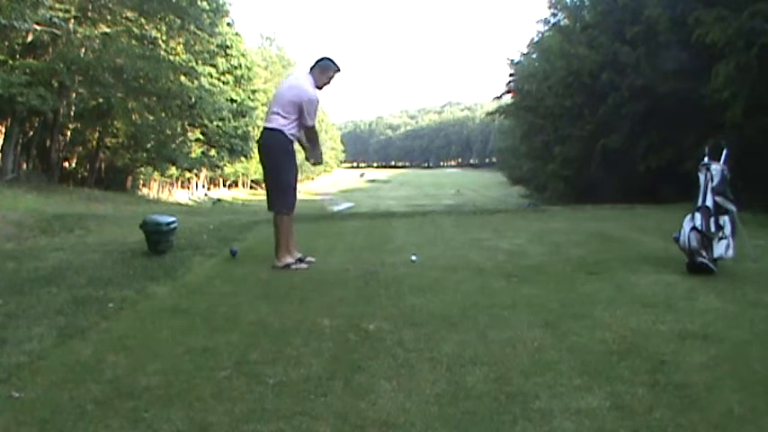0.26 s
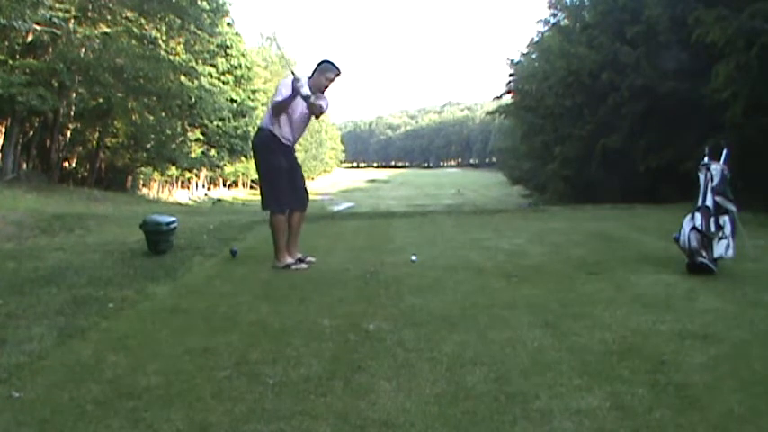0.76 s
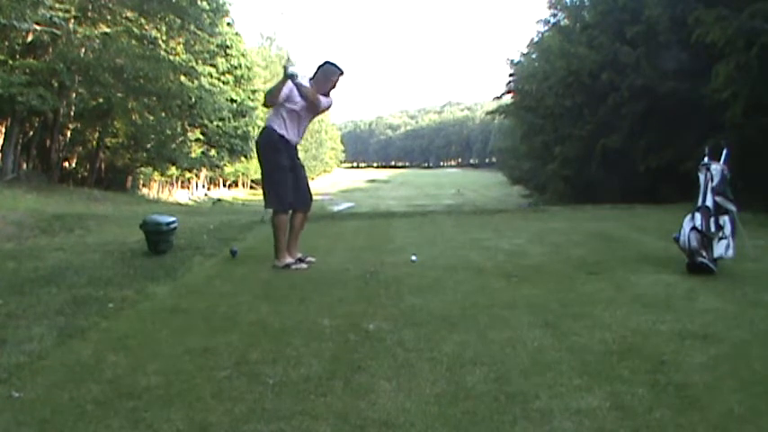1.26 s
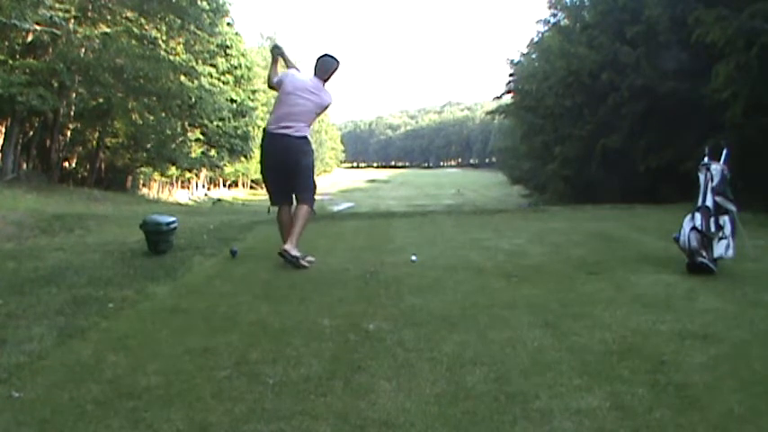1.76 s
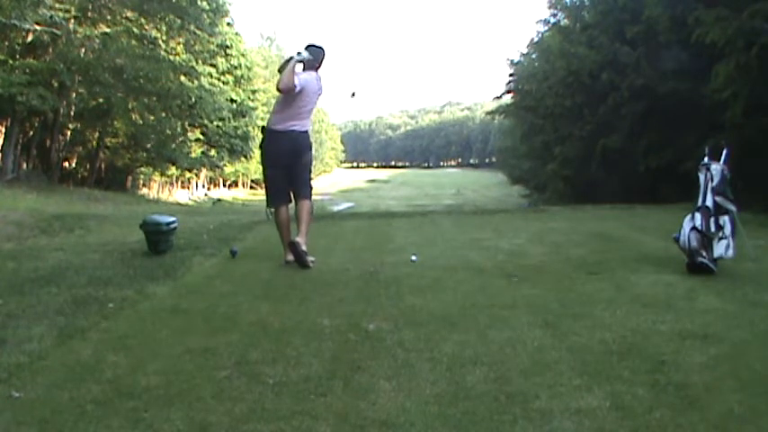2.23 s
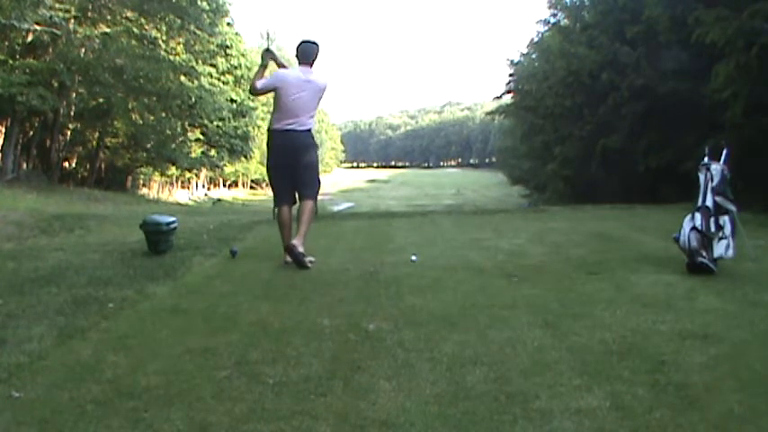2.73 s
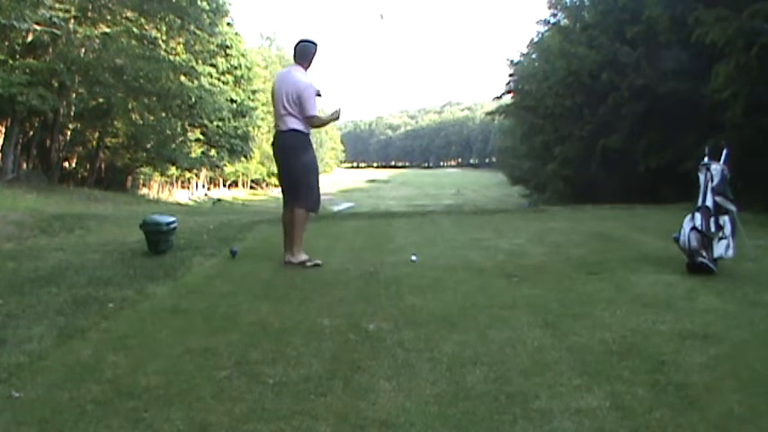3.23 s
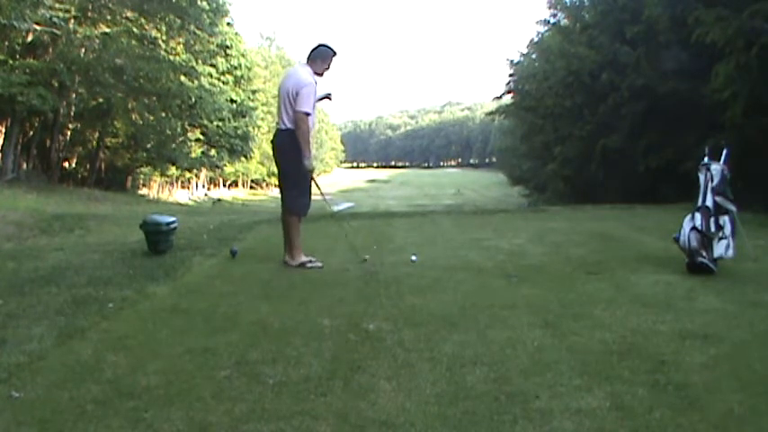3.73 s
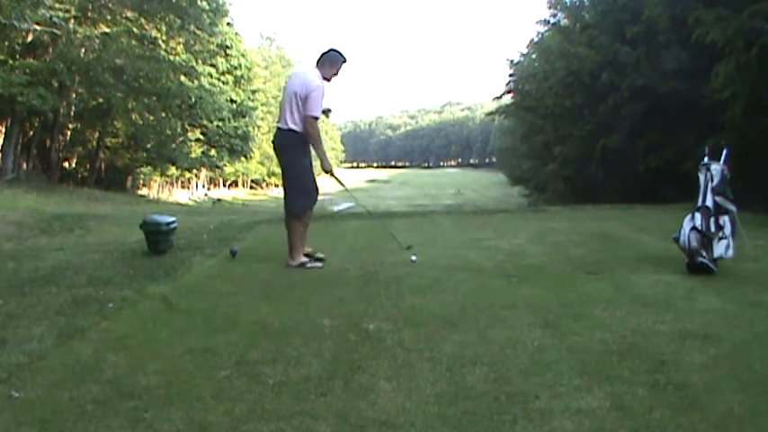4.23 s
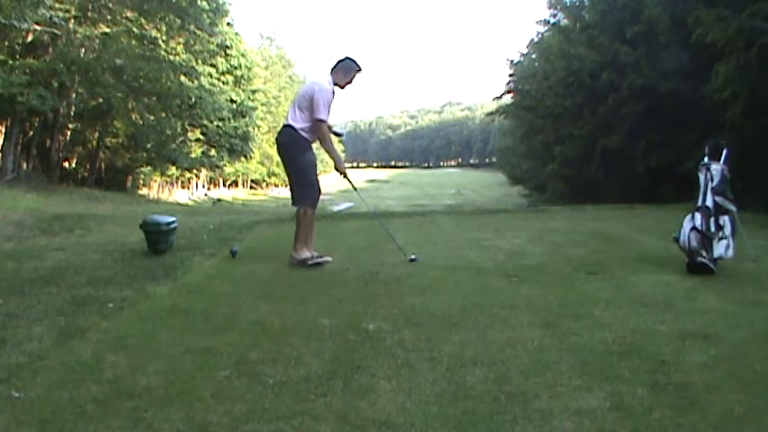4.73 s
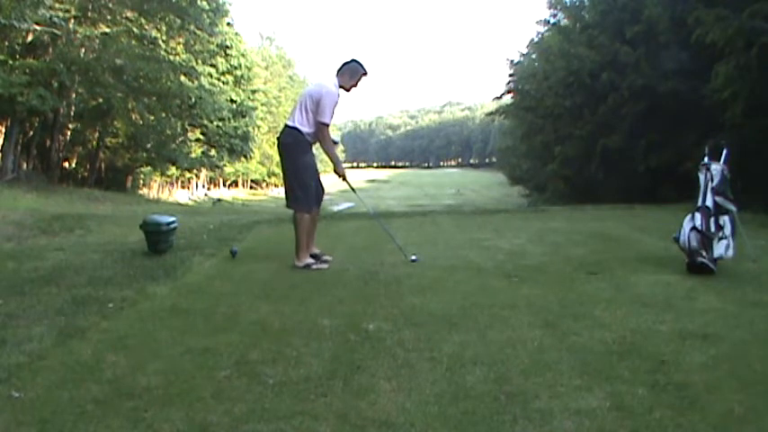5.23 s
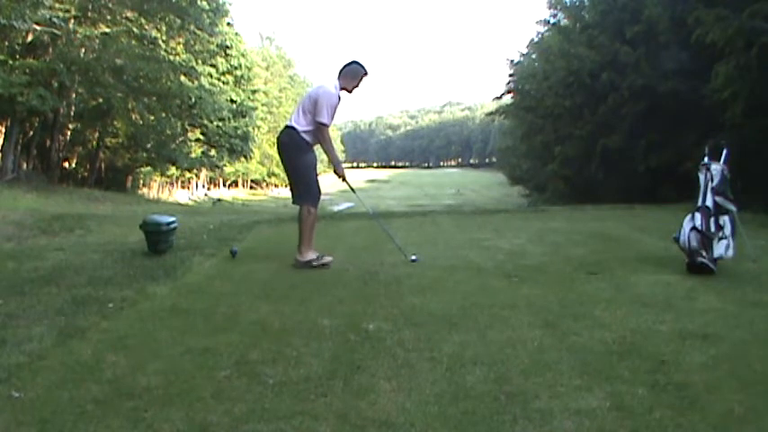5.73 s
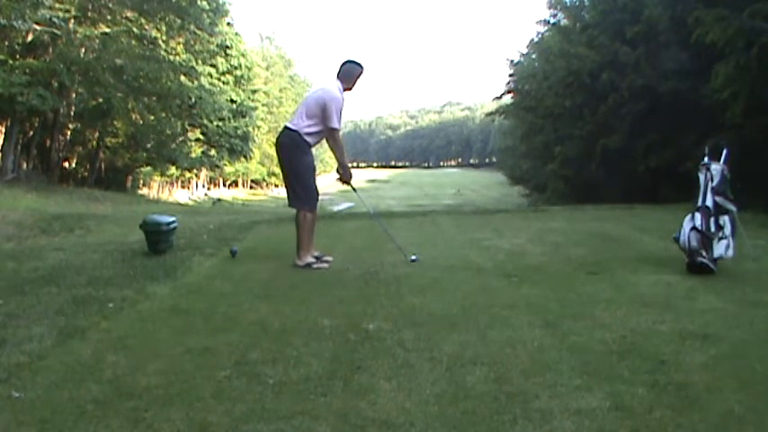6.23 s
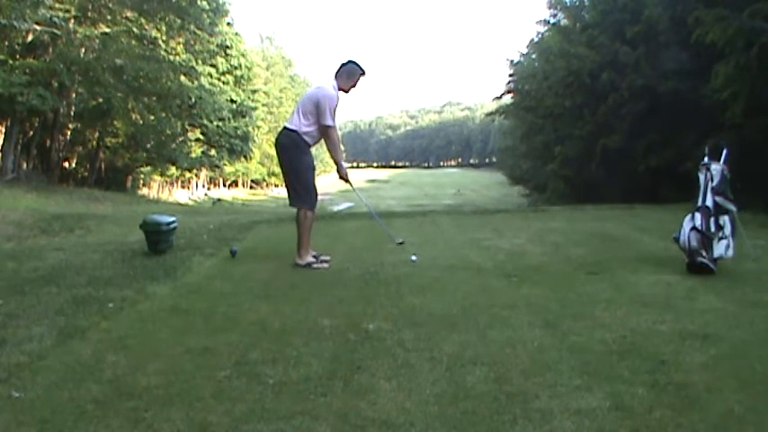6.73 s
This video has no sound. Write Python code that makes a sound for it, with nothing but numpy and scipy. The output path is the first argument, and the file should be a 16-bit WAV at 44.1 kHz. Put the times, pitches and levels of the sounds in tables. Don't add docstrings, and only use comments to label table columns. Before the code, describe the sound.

Outdoors on a grassy tee between woods, a low propeller drone grows and slowly drops in pitch over faint mower hum, traffic and hiss. High birds trill, chip and chatter throughout. A short club swish brushes the grass about a second and a half in; later come a sharp click and a soft double thud. A bird calls sharply near the end. The microphone stands back, with soft woodland echo.

```python
import sys
import numpy as np
from scipy import signal
from scipy.fft import rfft, irfft, next_fast_len
from scipy.io import wavfile

SR = 44100
rng = np.random.default_rng(int(sys.argv[2]) if len(sys.argv) > 2 else 0)


def attenuation_scalar(level_db):
    decades = np.asarray(level_db, float) / 20
    return 10 ** decades


def generate_wav(signal):
    frames = np.transpose(np.atleast_2d(signal))
    scaled = np.clip(frames, -1, 1) * 32767
    pcm = np.round(scaled).astype(np.int16)
    wavfile.write(sys.argv[1], SR, pcm)


N = 307377
SIDES = np.array([[1], [-1]])

# (frequency [Hz], level [dB per Hz])
AIR_COLOUR = [(590, -24), (1000, 0), (1220, -4), (4920, -8.5), (7030, -17.5), (9040, -16), (15500, -18)]
# (frequency [Hz], left minus right [dB])
NOISE_LEAN = [(60, -0.5), (110, -.3), (200, -1.5), (380, -2.5), (700, -.5), (1290, -1.5), (2380, 1),
              (4400, 2), (8120, .5), (15000, 0.5)]
# (frequency [Hz], side minus mid [dB])
NOISE_WIDTH = [(30, -21), (60, -31), (110, -27), (200, -13.5), (380, -3.5), (700, -2), (1290, -1.5),
               (2380, -2), (4400, -8), (8120, -3.5), (15000, -13.5)]
# (frequency [Hz], level [dB per Hz])
TRAFFIC_COLOUR = [(40, -51), (100, -15), (150, 5), (220, 2.5), (300, -3.5), (480, -12.5), (800, -50)]
# (time [s], rise [dB])
TRAFFIC_SURGES = [
    (.8, 9.5),
    (2.95, 11.5),
    (4.15, 4),
    (5.1, 4),
    (6.15, 6),
]
# (time [s], frequency [Hz], level [dB])
MOWER_BLADE = [(0, 92.9, -53), (.9, 93, -49.5), (1.3, 94.5, -46.5), (1.6, 96, -43.5), (1.9, 96.5, -47),
               (2.2, 98, -42.5), (2.6, 104.4, -42.5), (3.5, 102.8, -44.5), (5, 104.6, -50),
               (7, 104.3, -49.5)]
# (frequency [Hz], level [dB])
MOTOR_WHINE = [(700.8, -69), (840, -70)]

# (time [s], frequency [Hz])
SHAFT_SPEED = [(0, 18.12), (1.3, 18.15), (2, 18.02), (2.75, 17.82), (3.5, 17.45), (4.25, 16.95), (5, 16.62),
               (5.75, 16.37), (6.97, 16.08)]
# (time [s], level [dB])
PASS_SWELL = [(0, -2), (.7, -1), (1.15, 0.5), (1.7, -2), (2.1, 3), (2.5, -3.5), (3.2, 1), (4.2, 1),
              (4.9, -1.5), (5.3, -1), (5.95, 3), (6.3, -3), (6.97, -2)]
# (time [s], left minus right [dB])
PASS_POSITION = [(0, -0.5), (2, -1), (3.5, -0.5), (4.8, -.1), (6.1, -0.4), (6.97, -.3)]
# (multiple, level before [dB], level after [dB], time of change [s], later sink [dB per s])
STRONG_ORDERS = [
    (5, -49.5, -37, 2.25, 0.1),
    (8, -48.5, -59, 1.98, 0),
    (8, -71, -42, 3.7, 1.5),
    (10, -59, -41, 5.02, 0.3),
    (15, -64.5, -49.5, 5.52, 4.5),
]
# (multiple, level when far [dB], level when near [dB])
WEAK_ORDERS = [(2, -62, -70), (3, -57, -62.5), (4, -52, -67), (6, -60.5, -47.5), (7, -59, -52),
               (9, -58, -54), (11, -66.5, -56.5), (12, -60.5, -54.5), (13, -65, -58), (14, -65, -72),
               (16, -77, -91), (17, -69, -88)]
# (multiple, time [s], half length [s], level [dB])
ORDER_FLARES = [(8.5, 2.86, 0.65, -50), (16, 2.94, 0.25, -55), (11, 2.84, 0.31, -53.5),
                (15, 4.37, 0.52, -56), (7, 3.05, 0.69, -52), (7, 0.61, 0.35, -54), (15, 0.91, 0.19, -55),
                (13, 0.83, 0.23, -53), (11.5, 2.23, .35, -53), (10, 4.2, 0.35, -53.5),
                (9, 6.26, 0.33, -47.5), (11, 6.3, 0.5, -53.5), (25, 3.08, 0.32, -59), (10, .3, 0.23, -52.5),
                (11, .35, .25, -54), (4, .6, .3, -50), (8, .9, .25, -49), (8, 1.75, .15, -49),
                (10, .9, .2, -54), (10, 4.75, .2, -52)]
# (frequency [Hz], level [dB per Hz])
ROAR_COLOUR = [(12, -42), (20, -10.5), (43, -18.5), (70, -2), (92, -3), (159, -5), (257, -12.5), (350, -18),
               (422, -16.5), (565, -23), (837, -20.5), (912, -24.5), (1200, -30.5), (1560, -36),
               (2640, -120)]
BLADE_ORDER = 5

# (start [s], end [s], first pitch [Hz], level [dB], rate [notes per s])
TRILL_RUNS = [(0, 0.097, 9000, -66, 30), (.33, .6, 9000, -63.5, 29), (0.949, 1.335, 9080, -65, 35),
              (1.459, 1.753, 8800, -61.5, 29), (2.17, 2.45, 9100, -66, 48), (2.805, 3.05, 8720, -63, 35),
              (3.22, 3.593, 8720, -64, 37), (3.834, 4.2, 8800, -64, 35), (4.548, 4.8, 8740, -61.5, 39),
              (4.951, 5.3, 8700, -60, 29), (5.241, 5.33, 9850, -64, 40), (5.499, 5.85, 9000, -64, 30),
              (6.519, 6.78, 8700, -65, 27)]
# (start [s], end [s], first pitch [Hz], last pitch [Hz], level [dB])
WARBLE_PHRASES = [(.147, .235, 2950, 2960, -59), (.16, .22, 3250, 4300, -56), (0.22, .305, 3500, 3800, -61),
                  (.31, 0.378, 4450, 3800, -63), (.365, .435, 3450, 2350, -57.5),
                  (0.441, .5, 2350, 2350, -62), (0.45, .56, 2550, 2650, -64), (.5, .55, 2700, 3400, -58),
                  (.555, 0.54, 3300, 2600, -61), (1.61, 1.66, 2600, 2600, -56),
                  (1.655, 1.69, 2650, 3650, -56), (1.7, 1.79, 3350, 3350, -62),
                  (1.77, 1.81, 2600, 2800, -61), (1.52, 1.62, 4250, 3900, -58),
                  (1.58, 1.64, 3600, 3500, -62), (2.5, 2.56, 4900, 5300, -62), (2.6, 2.64, 3400, 3380, -59),
                  (2.73, 2.78, 2300, 2300, -59), (2.85, 2.92, 2148, 2100, -59),
                  (2.532, 2.61, 4400, 3900, -60), (2.59, 2.65, 3000, 3500, -60),
                  (2.75, 2.8, 2750, 2700, -56), (3.1, 2.89, 2300, 2550, -60),
                  (3.635, 3.68, 3450, 4000, -59), (3.67, 3.76, 4000, 3950, -63),
                  (4.155, 4.22, 3400, 3150, -54), (3.99, 4.1, 3400, 3300, -61),
                  (3.83, 3.92, 2450, 2260, -54), (3.77, 3.84, 2500, 2400, -59),
                  (3.93, 3.99, 2100, 2300, -56), (3.81, 3.86, 2000, 2000, -58),
                  (4.681, 4.85, 3360, 3420, -63.5), (4.58, 4.88, 2300, 2400, -59),
                  (3.039, 3.14, 3400, 3200, -60), (4.985, 5.05, 2880, 3580, -54),
                  (5.05, 5.119, 3500, 3500, -59), (5.13, 5.158, 3250, 3250, -56),
                  (4.99, 5.02, 2700, 3050, -60), (5.025, 5.06, 2600, 2650, -59),
                  (5.16, 5.23, 2600, 3010, -58), (5.22, 5.33, 3000, 3000, -60),
                  (6.17, 6.195, 3400, 3500, -57), (6.27, 6.305, 2680, 2950, -58),
                  (6.3, 6.35, 2750, 2800, -59), (6.345, 6.36, 3200, 3200, -56),
                  (6.3, 6.36, 3250, 3200, -61), (6.349, 6.45, 2600, 2600, -59),
                  (6.26, 6.34, 2200, 2200, -57), (6.141, 6.239, 2440, 2600, -60)]
# (start [s], end [s], first pitch [Hz], last pitch [Hz], level [dB])
CHATTER_PHRASES = [(2.46, 2.8, 4200, 3500, -60), (2.6, 2.97, 3000, 2900, -62.5),
                   (3.7, 4.0, 4300, 4600, -64), (3.81, 3.94, 4800, 4700, -59),
                   (4.98, 5.17, 3100, 3500, -61), (5.15, 5.35, 2700, 2800, -61),
                   (6.2, 6.45, 2800, 2600, -62), (4, 4.32, 3000, 2900, -59), (1.49, 1.68, 4050, 3900, -58),
                   (3.62, 3.78, 4500, 4600, -64.5), (.16, .36, 3600, 4000, -65),
                   (1.64, 1.82, 3500, 3700, -63), (4.56, 4.9, 2500, 2500, -62),
                   (4.65, 5.3, 4900, 4700, -67), (.45, .62, 2800, 2900, -64)]
# (start [s], level [dB], second half [dB], upswing depth [0-1], first downstroke [dB])
CHIP_CALLS = [(.566, -62, -2, 0.7, -8), (1.558, -53, -5, 0.7, -10), (2.016, -52.5, -6, 0.9, -14),
              (3.319, -51, -5, 0.99, -8), (3.825, -52, -5, 0.6, -3), (4.006, -57.5, -5, 1, 13),
              (4.14, -65, 5, .8, -8), (4.558, -60, 0, 1, 2), (4.704, -57.5, 1, 0.95, -1),
              (5.209, -59.5, 1.5, 0.8, -1), (5.517, -55, -1, 1, 9), (5.935, -57, 3, 1, -1),
              (6.529, -55.5, 0, 1, -.5), (6.869, -60, 1, 1, -3)]
# (time [s], frequency [Hz])
CHIP_SHAPE = [(0, 8870), (.007, 6916), (.013, 6970), (.019, 8240), (0.025, 9020), (0.028, 7880),
              (.037, 7160), (0.043, 8500)]
# (time [s], left minus right [dB])
CHIP_PERCH = [(5.3, 2), (6.0, -1.2)]
# (time [s], frequency [Hz], level [dB])
SEEP_CALL = [(5.85, 7950, -71), (5.87, 7900, -64), (5.9, 7680, -54.5), (5.93, 7500, -72)]
# (time [s], frequency [Hz], level [dB])
ALARM_CALL = [
    (5.364, 10900, -66),
    (5.368, 11200, -57),
    (5.373, 9800, -49),
    (5.379, 8100, -45),
    (5.384, 7250, -41),
    (5.389, 6880, -39),
    (5.396, 6750, -39),
    (5.41, 6980, -45),
    (5.421, 7200, -52),
]

# (start [s], length [s], first pitch [Hz], last pitch [Hz], level [dB])
THRUSH_SLURS = [(2.468, 0.024, 2760, 2420, -54.5), (2.487, 0.019, 2420, 2370, -53),
                (2.555, 0.043, 2600, 2160, -52), (2.705, 0.022, 2450, 2330, -48),
                (3.492, .02, 2220, 2300, -54), (3.508, 0.042, 2305, 2910, -49.5),
                (3.55, 0.024, 2480, 2360, -49.5), (3.572, .053, 2370, 2330, -47),
                (3.63, .025, 2300, 2400, -55), (3.705, 0.05, 2250, 2560, -57),
                (3.725, 0.042, 2300, 2160, -60), (3.956, .025, 2730, 3350, -55),
                (3.985, .03, 3400, 3300, -57), (4.03, 0.068, 2750, 2990, -56),
                (4.481, 0.071, 2150, 2190, -56.5), (4.535, .03, 2450, 2300, -58),
                (4.62, .03, 2485, 2200, -54), (4.553, 0.075, 2790, 2000, -49.5),
                (4.651, 0.054, 2620, 1940, -49.5), (4.647, 0.043, 1995, 2050, -53),
                (5.082, 0.035, 2110, 2100, -51.5), (2.593, 0.034, 2150, 2100, -53),
                (2.665, 0.04, 2215, 2680, -51.5), (4.1, 0.045, 3400, 2590, -57),
                (4.7, .05, 3000, 3230, -67), (4.762, 0.0366, 2153, 2680, -50),
                (4.796, .045, 2680, 2145, -50), (4.105, 0.029, 2350, 2150, -55),
                (4.155, .045, 2120, 2260, -57), (6.187, 0.029, 2090, 1940, -52),
                (6.217, 0.0409, 1954, 2110, -54), (3.085, .015, 2400, 1900, -58),
                (2.525, 0.021, 2350, 2600, -57)]
# (start [s], length [s], pitch at ends [Hz], pitch at turn [Hz], level [dB])
THRUSH_BENDS = [
    (3.049, 0.046, 2570, 2720, -50.5),
    (3.155, 0.049, 2640, 2800, -51.5),
    (3.663, .035, 2010, 2330, -51),
    (3.773, .05, 2130, 1938, -52.5),
]
# (start [s], length [s], frequency [Hz], level [dB])
THROBBING_NOTES = [(3.3, 0.069, 2960, -63), (3.38, .025, 3010, -54), (3.42, .11, 2980, -67),
                   (5.544, .03, 3000, -60), (5.6, 0.089, 3004, -60), (5.71, .025, 3000, -62),
                   (5.119, 0.056, 2065, -60)]
# (time [s], frequency [Hz], level [dB])
STUTTERED_PIPS = [(3.09, 2440, -56), (3.22, 2730, -61), (3.335, 2400, -54), (3.38, 2390, -54),
                  (3.43, 2390, -53), (5.575, 2410, -55), (5.59, 2100, -53), (5.618, 2394, -48.5),
                  (5.665, 2396, -59), (5.71, 2380, -64), (6.15, 2464, -56), (5.05, 2670, -55),
                  (5.16, 2050, -56), (2.9, 2170, -55)]

# (time [s], level [dB])
SWING_LEVEL = [
    (1.42, -76),
    (1.5, -52),
    (1.524, -52),
    (1.538, -39.5),
    (1.553, -49.5),
    (1.6, -53),
    (1.625, -77),
]
# (frequency [Hz], level [dB per Hz])
SWISH_COLOUR = [(250, -15), (400, 12), (520, 16), (680, 4), (1000, -1), (1300, -24), (4000, -50)]
# (frequency [Hz], level [dB per Hz])
GRASS_COLOUR = [(800, -27), (2000, 2), (6000, 4), (11000, 1), (15000, -4)]
# (frequency [Hz], level [dB], T60 [s])
TURF_BRUSH = (1.536, 0.0037, [(524, -37, 0.03), (312, -32, 0.03), (620, -33, 0.033), (960, -34, .03)])
# (frequency [Hz], level [dB], T60 [s])
TURF_SETTLES = (1.553, .006, [(420, -37.5, .12), (488, -42, .1)])
# (frequency [Hz], level [dB], T60 [s])
CLUB_TICK = (3.0209, .0001, [(4300, -29.5, .006), (3600, -35, .005), (5200, -35, .007), (9000, -37, .003),
             (7000, -40, .003)])
# (frequency [Hz], level [dB], T60 [s])
CLUB_CLICK = (3.0206, .0004, [(760, -26.5, .014), (560, -30, .022), (930, -32, .011)])
# (frequency [Hz], level [dB], T60 [s])
TURF_THUD = (3.7918, .001, [(400, -26.5, .022)])
# (frequency [Hz], level [dB], T60 [s])
TURF_BOUNCE = (3.7966, .001, [(265, -24, .045), (540, -30.5, .018), (370, -28, .03)])

WOODS_T60_S, THICKET_T60_S = 0.65, 0.095


def rms_one(x):
    return x / np.sqrt(np.mean(x ** 2) + 1e-20)


def in_time(rows):
    s, *columns = np.transpose(rows)
    return [np.interp(np.arange(N) / SR, s, column) for column in columns]


def at_hz(points, hz):
    point_hz, db = np.transpose(points)
    return np.interp(np.log(hz), np.log(point_hz), db)


def pan(left_minus_right_db):
    return attenuation_scalar(SIDES * left_minus_right_db / 2)


def drift(rate):
    r = np.exp(-80 * np.pi * rate / SR)
    noise = rng.standard_normal(N // 40 + 2002)
    slow = rms_one(signal.lfilter([1], [1, -2 * r, r * r], noise)[2000:])
    return np.interp(np.arange(N) / 40, np.arange(len(slow)), slow)


def coloured(spectrum):
    hz = np.maximum(np.fft.rfftfreq(N, 1 / SR), 1)
    mid, side = rfft(rng.standard_normal((2, N)))
    pair = mid + attenuation_scalar(at_hz(NOISE_WIDTH, hz)) * side * SIDES
    return rms_one(irfft(pair * pan(at_hz(NOISE_LEAN, hz)) * attenuation_scalar(at_hz(spectrum, hz)), N))


def add(out, rows, pan_db=0, octave_db=-60, fade_s=0.00071):
    s, hz, db = np.transpose(rows)
    at = np.arange(max(round(s[0] * SR), 0), min(round(s[-1] * SR), N))
    t = at / SR
    pitch_hz = np.interp(t, s, hz)
    phase = 2 * np.pi * np.cumsum(pitch_hz) / SR
    ends = np.clip(np.minimum(t - s[0], s[-1] - t) / fade_s, 0, 1)
    octave = attenuation_scalar(octave_db) * (pitch_hz < SR / 6) * np.sin(2 * phase)
    tone = np.sin(phase) + octave
    out[:, at] += np.sqrt(2) * attenuation_scalar(np.interp(t, s, db)) * ends * tone * pan(pan_db)


def woods(x, t60_s, gap_s):
    t, out = np.arange(SR // 2) / SR, 0
    leaf_share, leaves_per_s = 0.7, 39
    for _ in range(3):
        mid, side = rng.standard_normal((2, len(t))) * attenuation_scalar(-60 * t / t60_s) * (t > gap_s)
        tail = (mid + attenuation_scalar(-10.0) * side * SIDES) / np.sqrt(3 * np.sum(mid ** 2))
        flicker = np.sqrt(1 - leaf_share ** 2) + leaf_share * drift(leaves_per_s)
        out = out + flicker * signal.fftconvolve(x, tail, axes=1)[:, :N]
    return out


def air():
    return attenuation_scalar(-53.0 + 0.21 * drift(4.3)) * coloured(AIR_COLOUR)


def traffic():
    t = np.arange(N) / SR
    surge_db = sum(db * np.exp(-((t - s) / 0.18) ** 2) for s, db in TRAFFIC_SURGES)
    return attenuation_scalar(-59 + surge_db + 2.0 * drift(3.9)) * coloured(TRAFFIC_COLOUR)


def mower():
    blade_hz, blade_db = in_time(MOWER_BLADE)
    blade_phase = 2 * np.pi * np.cumsum(blade_hz) / SR + 0.31 * drift(1.5)
    blade = attenuation_scalar(blade_db + 0.34 * drift(7.5)) * np.sin(blade_phase)
    t = np.arange(N) / SR
    whine = sum(attenuation_scalar(db) * np.sin(2 * np.pi * hz * t + .5 * drift(8.6)) for hz, db in MOTOR_WHINE)
    return np.sqrt(2) * (blade * pan(in_time(PASS_POSITION)[0]) + whine)


def aircraft():
    t, swell_db = np.arange(N) / SR, in_time(PASS_SWELL)[0]
    turns = 2 * np.pi * np.cumsum(in_time(SHAFT_SPEED)[0]) / SR
    near = np.interp(t, [2.0, 5.5], [0, 1])

    def turned(s):
        return .5 + .5 * np.tanh((t - s) / 0.18)

    orders = []
    for k, before_db, after_db, s, sink_db in STRONG_ORDERS:
        db = before_db + turned(s) * (after_db - before_db) - sink_db * np.maximum(t - s, 0)
        orders.append((k, db + (k == BLADE_ORDER) * swell_db))
    for k, far_db, near_db in WEAK_ORDERS:
        orders.append((k, far_db + near * (near_db - far_db)))
    for k, s, half_s, db in ORDER_FLARES:
        orders.append((k, db - 6 * ((t - s) / half_s) ** 2))

    drone = np.zeros((2, N))
    for k, db in orders:
        waver = 0.18 * drift(4.3) + rng.uniform(0, 2 * np.pi)
        apart = 0.0016 * k ** 1.62 * drift(1.5) * SIDES
        drone += attenuation_scalar(db + 1.23 * drift(4.6)) * np.sin(k * turns + waver + apart)
    roar_db = -51 + turned(2.41) * 4 + 0.53 * swell_db
    roar = attenuation_scalar(roar_db + 4.5 + 0.72 * drift(1.7)) * coloured(ROAR_COLOUR)
    return np.sqrt(2) * drone * pan(in_time(PASS_POSITION)[0]) + roar


def twitter(phrases, spread_hz, step_s):
    out = np.zeros((2, N))
    for start, end, first_hz, last_hz, db in phrases:
        luck = rng.uniform(-1.004, 1, (320, 3))
        slope = (last_hz - first_hz) / (end - start)
        for s, (place, sweep, loud) in zip(np.arange(start - .005, end - .012, step_s), luck):
            hz = first_hz + slope * (s + .01 - start) + spread_hz * place
            swing_hz = 0.602 * spread_hz * sweep + 0.0092 * slope
            along = 2 * (s + 0.012 - start) / (end - start) - 1
            level_db = db + 2.4 * loud - 5.5 * along ** 2
            add(out, [(s, hz - swing_hz, level_db), (s + .018, hz + swing_hz, level_db)], fade_s=0.0044)
    return out


def trills():
    out = np.zeros((2, N))
    for start, end, first_hz, db, per_s in TRILL_RUNS:
        luck = rng.normal(0, 1, (24, 2))
        for s, (wobble, loud) in zip(np.arange(start, end, 1 / per_s), luck):
            hz = first_hz + 290 * (s - start) + 100 * wobble
            note = [(s, hz - 200, db + 1.2 * loud), (s + 0.0201, hz + 200, db + 1.3 * loud)]
            add(out, note, pan_db=-3.0)
    return out


def warblers():
    phrases = WARBLE_PHRASES
    out = attenuation_scalar(-2.5) * twitter(phrases, spread_hz=149, step_s=.008)
    for start, end, first_hz, last_hz, db in phrases:
        add(out, [(start, first_hz, db - 1.5), (end, last_hz, db - 1.5)], fade_s=.008)
    return out * attenuation_scalar(2.8 * drift(60))


def far_birds():
    high, song = trills(), warblers()
    haze = twitter(CHATTER_PHRASES, spread_hz=801, step_s=.0022)
    blurred = attenuation_scalar(-3.0) * high + attenuation_scalar(-7.0) * song + attenuation_scalar(-5.5) * haze
    return attenuation_scalar(-5.5) * high + attenuation_scalar(-5.5) * song + woods(blurred, THICKET_T60_S, gap_s=0.0012)


def near_birds():
    out, hidden = np.zeros((2, 2, N))
    lag, hz = np.transpose(CHIP_SHAPE)
    late, low_hz = lag > .016, hz.min()
    for s, db, late_db, depth, first_db in CHIP_CALLS:
        pan_db = np.interp(s, *np.transpose(CHIP_PERCH))
        shape_hz = np.where(late, low_hz + depth * (hz - low_hz), hz)
        uneven_db = rng.normal(0, 1.0, len(lag)) - 1.4 * (shape_hz - low_hz) / 1000
        level_db = db + late_db * late + first_db * (lag < .005) + uneven_db
        direct_db = level_db + 0.7 * (db + 51.0)
        hidden_db = level_db - 6.5 - .45 * (db + 51.0)
        add(out, np.transpose([s + lag, shape_hz, direct_db]), pan_db, fade_s=0.0014)
        add(hidden, np.transpose([s + lag, shape_hz, hidden_db]), pan_db, fade_s=0.001)
    out *= attenuation_scalar(0.51 * drift(100))
    out += woods(hidden, THICKET_T60_S, gap_s=.001)
    add(out, SEEP_CALL, pan_db=7.0)
    return out


def alarm():
    out = np.zeros((2, N))
    add(out, ALARM_CALL, pan_db=3.0, octave_db=-17)
    return out + attenuation_scalar(-13.0) * woods(out, THICKET_T60_S, gap_s=.004)


def thrush():
    out, u = np.zeros((2, N)), np.linspace(0, 1, num=33)
    for s, length, first_hz, last_hz, db in THRUSH_SLURS:
        slur_hz = first_hz + (last_hz - first_hz) * u
        shape_db = np.interp(u, [0, 0.51, 1], [-5.5, 0, -4.5])
        add(out, np.transpose([s + length * u, slur_hz, db + shape_db]), pan_db=5.0)
    for s, length, end_hz, turn_hz, db in THRUSH_BENDS:
        away = (2 * u - 1) ** 2
        bend_hz = turn_hz + (end_hz - turn_hz) * away
        add(out, np.transpose([s + length * u, bend_hz, db - 6.5 * away]), pan_db=5.5)
    for s, length, hz, db in THROBBING_NOTES:
        throb_db = -np.cos(2 * np.pi * 33 * length * u)
        add(out, np.transpose([s + length * u, hz + 0 * u, db + throb_db]), pan_db=6.0, fade_s=0.01)
    for s, hz, db in STUTTERED_PIPS:
        add(out, [(s - .011, hz + 40, db), (s + 0.012, hz - 40, db)], pan_db=5.0, fade_s=0.01)
    return out * attenuation_scalar(1.3 * drift(70))


def knock(s, rise_s, modes):
    t = np.maximum(np.arange(N) / SR - s, 0)
    rings = sum(attenuation_scalar(db - 60 * t / t60) * np.sin(2 * np.pi * hz * t) for hz, db, t60 in modes)
    return rings * (1 - np.exp(-t / rise_s)) ** 2


def club():
    swing = attenuation_scalar(in_time(SWING_LEVEL)[0] - 2.5 + 1.6 * drift(100)) * coloured(SWISH_COLOUR)
    lag = np.arange(N) / SR - 1.548
    cut_db = -52 + np.minimum(480 * lag, -520 * lag)
    grass = attenuation_scalar(cut_db + 4.0 * drift(300)) * coloured(GRASS_COLOUR)
    knocks = knock(*TURF_BRUSH) + knock(*TURF_SETTLES) + knock(*CLUB_TICK) + knock(*CLUB_CLICK)
    knocks += knock(*TURF_BOUNCE) - knock(*TURF_THUD)
    return swing + grass + knocks * pan(-1.2)


def scene():
    far, near, call, song, iron = far_birds(), near_birds(), alarm(), thrush(), club()
    sent = attenuation_scalar(-7.5) * song + attenuation_scalar(-10.0) * near + attenuation_scalar(-12.5) * call + attenuation_scalar(-5.5) * far + attenuation_scalar(-7.5) * iron
    echo = woods(sent, WOODS_T60_S, gap_s=.012)
    background = air() + traffic() + mower() + aircraft()
    return background + attenuation_scalar(-4.0) * far + near + call + attenuation_scalar(-2.1) * song + iron + echo


def roll_off(x):
    return signal.sosfilt(signal.butter(12, 16800, fs=SR, output="sos"), x)


def record(dry):
    size = next_fast_len(N + SR // 10)
    passed = np.fft.rfftfreq(size, 1 / SR) < 15725
    mix = irfft(rfft(dry, size) * passed, size)[:, :N]
    return roll_off(mix)


dry = scene()
out = record(dry)
generate_wav(out)
```